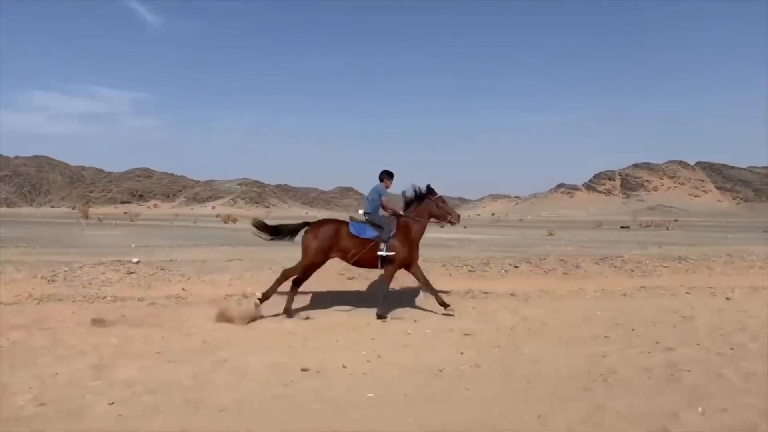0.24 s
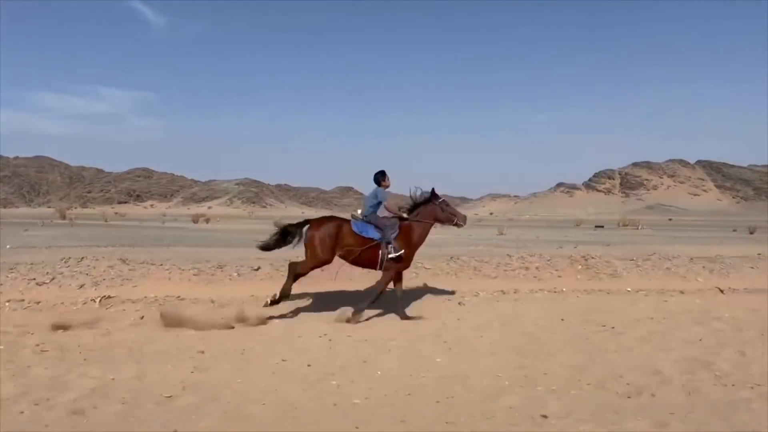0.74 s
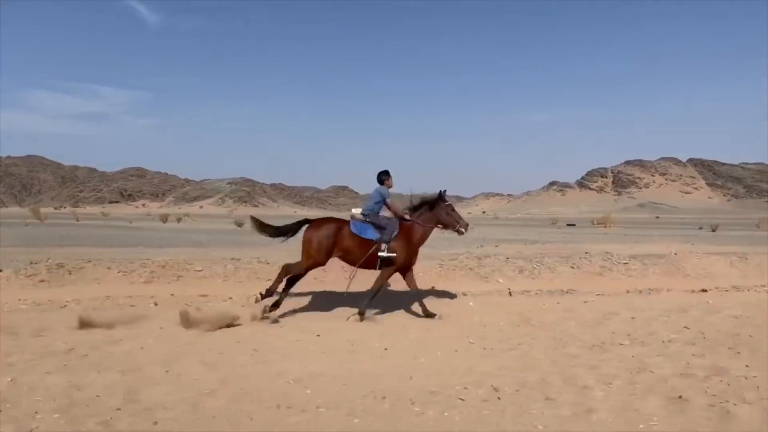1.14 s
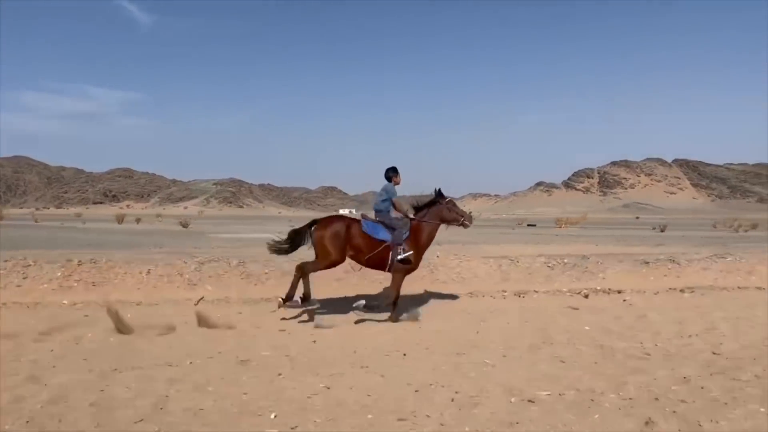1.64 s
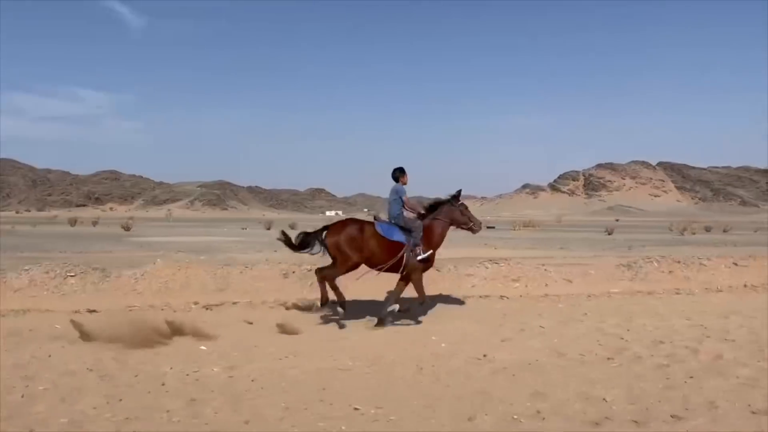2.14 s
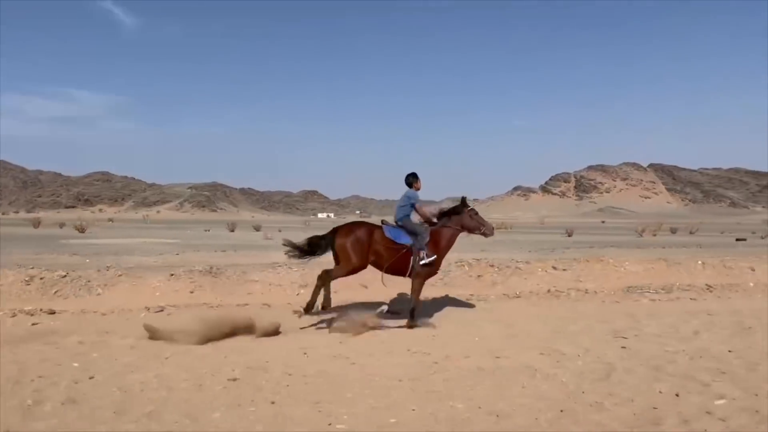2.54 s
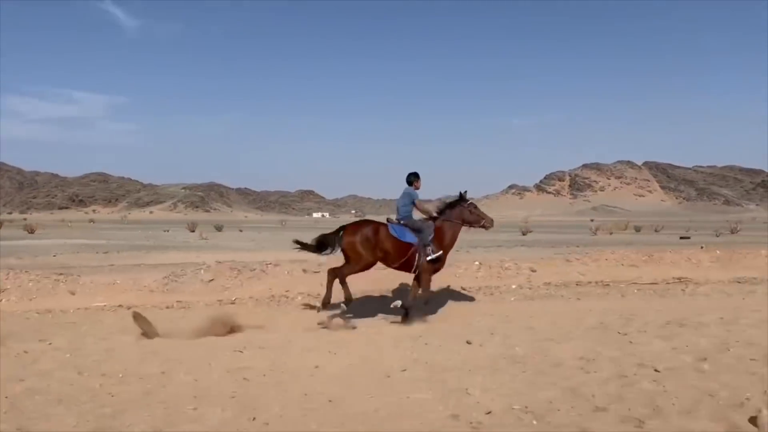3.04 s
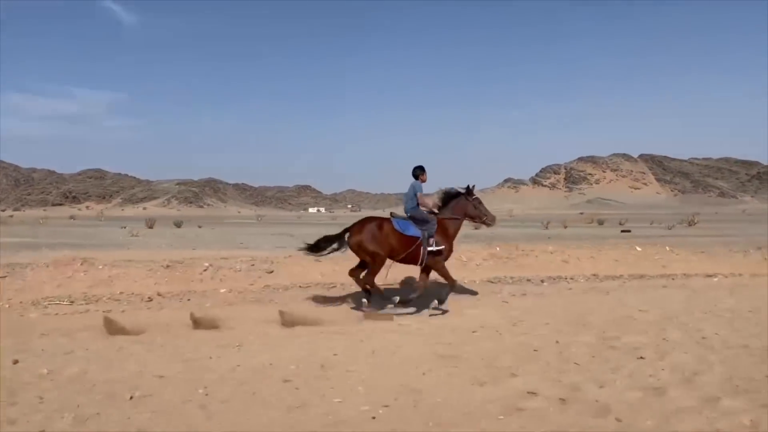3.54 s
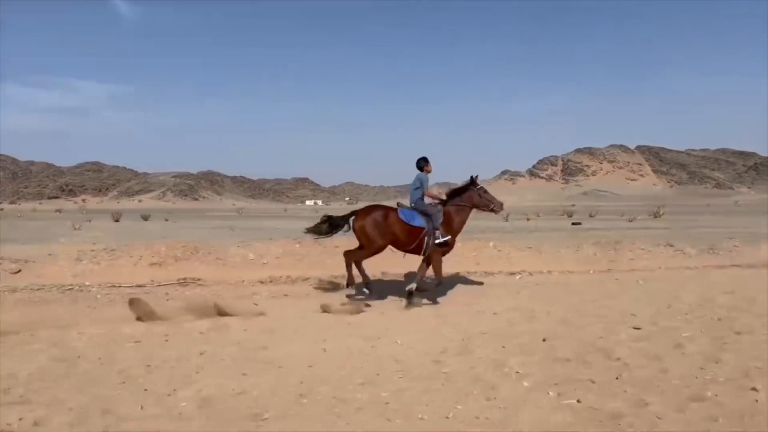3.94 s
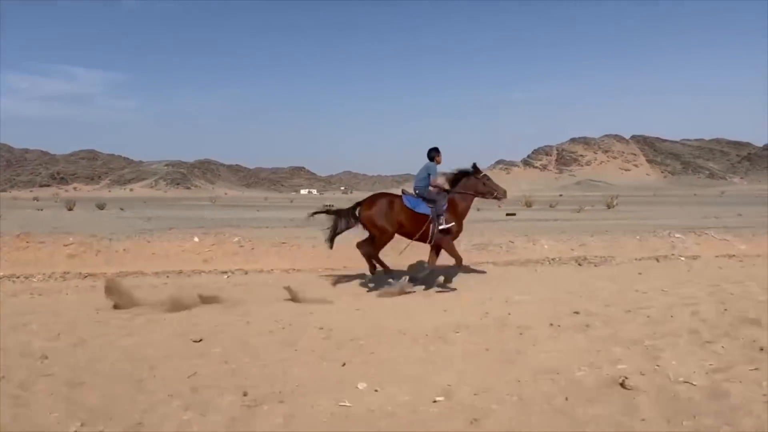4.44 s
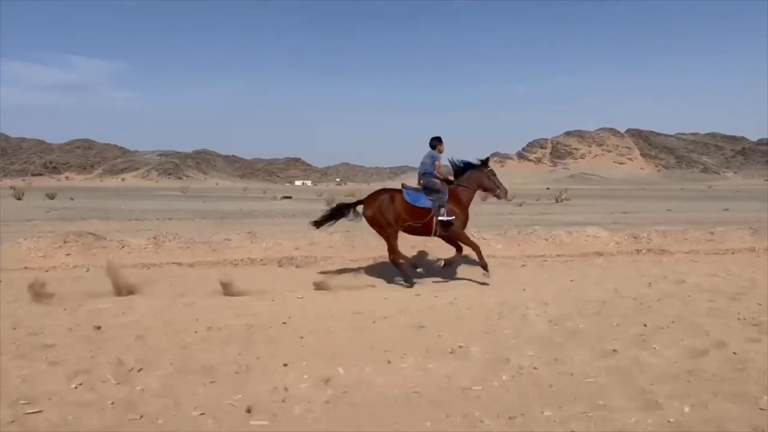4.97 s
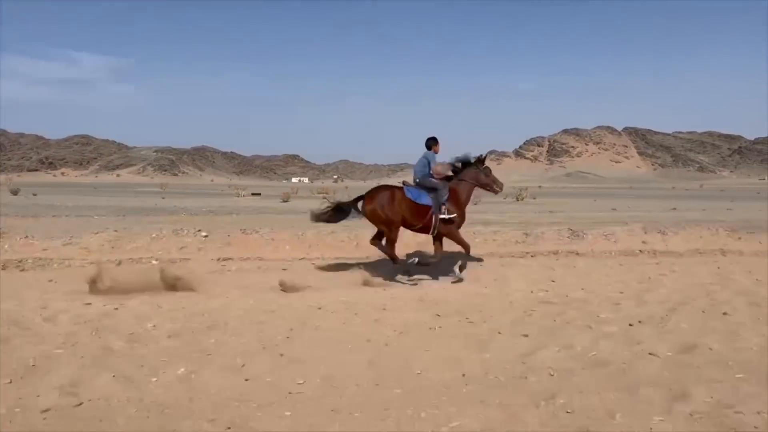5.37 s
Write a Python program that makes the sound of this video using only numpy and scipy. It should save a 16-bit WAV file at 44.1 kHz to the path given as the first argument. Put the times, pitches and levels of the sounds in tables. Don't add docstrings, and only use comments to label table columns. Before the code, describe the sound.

A galloping horse on open sand: dull low thuds with cracking crust and snapping stones, first in a strong uneven cluster, then sparser and softer. Loose metal fittings tick and clink between beats. Wind buffets the microphone with deep rumble and faint hiss throughout. In the last second the hooves become dense, loud and nearly overloaded. Dry outdoor sound, no echo, stereo microphone moving alongside.

```python
import sys
import numpy as np
from scipy import signal
from scipy.io import wavfile
from scipy.ndimage import uniform_filter1d

SR = 44100
rng = np.random.default_rng(int(sys.argv[2]) if len(sys.argv) > 2 else 0)


def volts_from_decibels(level):
    exponent = np.asarray(level, float) / 20
    return 10 ** exponent


def wav_out(sig):
    wavfile.write(sys.argv[1], SR, np.round(np.clip(np.atleast_2d(sig).T, -1, 1) * 32767).astype(np.int16))


N = 247301
OPPOSED = np.array([[1], [-1]])

# [crest t/s, knock level/dB, knock f/Hz, swell level/dB, crack level/dB]
LANDINGS = [(0.014, -16.5, 203, -9, -26), (0.427, -10, 270, -6.5, -30), (0.767, -5.5, 269.8, -9, -19.5),
            (1.127, -13, 262, -11.5, -35), (1.687, -2, 225.4, -5, -49), (2.411, -18, 226, -15, -47),
            (2.482, -18.5, 259, -14.5, -50), (2.771, -18, 210.3, -9.5, -33),
            (3.741, -17.5, 192.3, -11.5, -46), (3.979, -11, 226, -6.5, -38), (4.716, -2.5, 287.6, -5, -34),
            (4.822, -2, 258.8, -6, -24), (4.917, -5.5, 297, -4.5, -28), (5.077, -11.5, 287, -8, -45),
            (5.143, -9.5, 236.7, -3.5, -9), (5.261, -8, 346.6, -5, -33), (5.488, -12, 214.5, -7, -48),
            (5.573, -2, 267.7, -9, -17.5)]
# [crest t/s, knock level/dB, knock f/Hz, crack level/dB]
TOUCHES = [(0.351, -12, 210, -38), (0.415, -13, 243, -52), (0.746, -3, 187.7, -50),
           (1.706, -15.5, 280, -50), (2.786, -8.5, 274.4, -40), (4.171, -17, 229, -56),
           (4.194, -12.5, 254.4, -35), (4.682, -19, 182, -35), (4.761, -12, 254, -34),
           (4.832, -6, 306, -38), (4.992, -13.5, 281, -54), (5.113, -14.5, 206.5, -46),
           (5.159, -7, 253, -25), (5.242, -5, 177.5, -29), (5.279, -18, 250, -28), (5.286, -13.5, 241, -29)]


def rms_one(x):
    return x / np.sqrt(np.mean(x ** 2) + 1e-20)


def stereo_rms_one(x):
    return x / np.sqrt(np.mean(x.mean(axis=0) ** 2))


def at_hz(points, hz):
    table = np.array(points, float)
    return np.interp(np.log(hz), np.log(table[:, 0] + 1), table[:, 1])


def drift(rate_hz):
    r = np.exp(-40 * np.pi * rate_hz / SR)
    white = rng.standard_normal(N // 20 + 4002)
    slow = signal.lfilter([1], [1, -2 * r, r * r], white)[4000:]
    return np.interp(np.arange(N) / 20, np.arange(len(slow)), rms_one(slow))


def band(x, low_hz, high_hz, order=2):
    return signal.sosfilt(signal.butter(order, [low_hz, high_hz], "band", fs=SR, output="sos"), x)


def steep(x, edge_hz, kind):
    return signal.sosfilt(signal.ellip(10, .5, 65, edge_hz, kind, fs=SR, output="sos"), x)


def pan(x, left_db):
    return x * volts_from_decibels([[left_db / 2], [-left_db / 2]])


def add(out, piece, s):
    at = round(s * SR) - piece.shape[1] // 2
    piece = piece[:, max(-at, 0):N - at]
    out[:, max(at, 0):max(at, 0) + piece.shape[1]] += piece


def swell(hz, width_ms, fall, rough, reach):
    width = width_ms * SR / 1000
    t = np.arange(-3 * width, 3 * width) / width
    pitch_hz = hz * np.exp(-np.clip(fall * t, -1.2, 1.2))
    swing = np.sqrt(2) * np.sin(2 * np.pi * (np.cumsum(pitch_hz) / SR + rng.random()))
    white = rng.standard_normal((3, len(t) + 1024))
    noise = rms_one(band(white, .55 * hz, reach * hz, order=3)[:, 1024:])
    ports = noise[2] + 0.32 * noise[:2]
    shape, share = np.exp(-1.9 * t ** 2), np.clip(rough, 0, 1)
    mixed = shape * (np.sqrt(1 - share) * swing + np.sqrt(share) * ports)
    return mixed * np.sqrt(np.sum(shape ** 2) / np.sum(mixed.mean(axis=0) ** 2) / 2)


def knocks():
    # [crest t/s, level/dB, f/Hz]
    scuffs = [(0.388, -22, 275), (0.447, -20, 243.4), (0.635, -14.5, 197.5), (1.343, -19.5, 224),
              (1.41, -19, 196), (1.469, -36, 186.4), (2.494, -31, 225), (2.629, -19, 247.6),
              (3.264, -22, 269.6), (3.538, -21, 257), (3.591, -19, 225), (3.864, -24, 200),
              (3.927, -21, 192), (3.96, -26, 193.3), (4.119, -21, 232), (4.132, -17, 233),
              (4.179, -17, 213), (4.786, -17, 306), (5.098, -16, 262), (5.394, -22, 236.5),
              (5.461, -17.5, 233), (5.497, -17, 227)]
    # [crest t/s, level/dB, f/Hz, width/ms]
    last_thud = (5.6052, -19, 450, 4)
    out, cycles = np.zeros((2, N)), 1.75
    rows = [row[:3] for row in LANDINGS + TOUCHES + scuffs]
    thuds = [(s, crest_db, hz, 1000 * cycles / hz) for s, crest_db, hz in rows]
    for s, crest_db, hz, width_ms in thuds + [last_thud]:
        add(out, volts_from_decibels(crest_db - .7) * swell(hz, width_ms, fall=.7, rough=.14, reach=1.8), s)
    return out


def low_swell(hz, width_ms):
    return swell(hz, width_ms, fall=.35, rough=0.43, reach=2.04)


def hoof_swells():
    out, lag_s = np.zeros((2, N)), 0.01189
    for s, _, _, swell_db, _ in LANDINGS:
        add(out, volts_from_decibels(swell_db) * low_swell(hz=77.88, width_ms=24.5), s + lag_s)
    return out


def add_crack(out, s, crest_db, hz, grit_db, width_ms):
    crack = swell(.85 * hz, width_ms, fall=.45, rough=.4, reach=1.7)
    grit = swell(1835, width_ms, fall=.05, rough=.9, reach=1.3)
    left_db = np.clip(-4 - 0.34 * grit_db, -8, 8)
    add(out, pan(volts_from_decibels(crest_db - .7), left_db) * crack, s)
    add(out, pan(volts_from_decibels(crest_db + grit_db + 7.0), left_db) * grit, s)


def hoof_cracks():
    out, lead_s = np.zeros((2, N)), 0.001914
    for row in LANDINGS + TOUCHES:
        s, crack_db = row[0], row[-1]
        grit_db = -25 + .3 * (crack_db + 20)
        add_crack(out, s - lead_s, crack_db, 766.4, grit_db, width_ms=4.1)
    return out


def bodies():
    # [crest t/s, level/dB, width/ms, level of the part opposed in the ports/dB]
    body_rows = [(0.748, -18.5, 6, -36), (0.764, -35, 7.8, -34), (0.878, -39, 8.6, -20),
                 (1.124, -28, 4.3, -42), (1.684, -26, 6.8, -16), (2.777, -29.5, 8.1, -28),
                 (2.985, -38, 8.7, -23), (3.63, -25, 4.3, -36), (4.19, -33, 5, -40), (4.721, -24, 7.7, -17),
                 (4.761, -27, 4.9, -29), (4.814, -14, 5, -25), (4.826, -30, 9.8, -17),
                 (4.914, -13.5, 7.7, -25), (5.11, -23, 4.6, -36), (5.145, -12, 9.7, -26),
                 (5.157, -14, 6.3, -24), (5.263, -20, 13, -25), (5.28, -22, 5.1, -30),
                 (5.568, -18, 6.7, -28)]
    out = np.zeros((2, N))
    for s, crest_db, width_ms, opposed_db in body_rows:
        hollow = swell(600, width_ms, fall=.2, rough=.6, reach=1.5)
        shake = swell(415, width_ms, fall=.2, rough=.6, reach=1.6)
        add(out, pan(volts_from_decibels(crest_db), 4.0) * hollow, s)
        add(out, volts_from_decibels(opposed_db) * shake * OPPOSED, s)
    return out


def snaps():
    # [crest t/s, level/dB, f/Hz]
    snap_rows = [(0.3475, -17, 634), (0.384, -35, 2480), (0.411, -32, 530), (0.4236, -12, 600),
                 (0.436, -22, 450), (0.461, -25.5, 1500), (1.1252, -32, 650), (0.617, -17, 79.5),
                 (1.925, -19, 65.3), (2.7745, -22, 645), (2.976, -17.5, 65), (3.565, -19, 75),
                 (3.7245, -25, 876), (4.7225, -9, 520), (4.7273, -8, 203), (4.735, -12, 430),
                 (4.83, -3, 115), (4.844, -19, 400), (5.2545, -12, 520), (5.2625, -12, 560),
                 (5.2775, -10, 150), (5.527, -36, 1500), (0.7499, -18.5, 1530), (0.7643, -18, 795),
                 (1.3366, -22.5, 1720), (1.6815, -17.5, 533), (3.63, -34, 910), (4.1905, -24.5, 620),
                 (4.7115, -32, 650), (4.7605, -28, 700), (4.813, -29, 900), (4.824, -4, 520),
                 (4.9118, -23, 775), (5.0792, -26, 2760), (5.1105, -37, 800), (5.147, -11, 560),
                 (5.167, -18, 520), (5.136, -13.5, 1410), (5.1433, -23, 900), (5.149, -35, 2770),
                 (5.5665, -16.5, 800)]
    # [crest t/s, level/dB, f/Hz]
    last_snap = (5.60785, -7, 560)
    # [crest t/s, level/dB, f/Hz]
    ping_rows = [(1.156, -39, 2650), (1.234, -35, 2700), (3.053, -36, 2700), (3.221, -32, 2620),
                 (3.227, -38, 3420), (4.818, -19.5, 1640), (4.832, -29, 1450), (5.079, -30, 1500),
                 (5.141, -17, 2400), (5.151, -30, 1900), (4.913, -36, 1680), (4.915, -37, 2400),
                 (4.82, -33, 2530), (5.255, -30, 1580), (5.261, -39, 2000), (5.273, -36, 1300),
                 (5.265, -38, 1700)]
    out, t = np.zeros((2, N)), np.arange(-1536, 1536) / SR
    snap_cycles, ping_cycles = 0.72, 3.2
    strikes = [(*row, snap_cycles) for row in snap_rows + [last_snap]]
    strikes += [(*row, ping_cycles) for row in ping_rows]
    for s, crest_db, hz, cycles in strikes:
        crest = np.cos(2 * np.pi * hz * t) * np.exp(-(hz * t / cycles) ** 2)
        add(out, pan(volts_from_decibels(crest_db) * crest, 4.6), s)
    return out


def sprays():
    # [crest t/s, level/dB, width/ms]
    spray_rows = [
        (4.718, -58, 11),
        (4.823, -26, 12),
        (5.148, -62, 13),
        (5.266, -40, 11),
        (5.572, -42, 10),
    ]
    out = np.zeros((2, N))
    for s, crest_db, width_ms in spray_rows:
        add(out, pan(volts_from_decibels(crest_db), 5.0) * swell(1200, width_ms, fall=.05, rough=1, reach=1.5), s)
    return out


def slaps():
    # [crest t/s, level/dB, centre f/Hz, grit over crest/dB]
    slap_rows = [(0.041, -31, 1007, -9.5), (0.462, -33.5, 1068, -6), (0.75, -25, 1107, -32),
                 (0.878, -32.5, 1078, -9), (1.157, -33, 1094, -9), (1.235, -27, 890, -11.5),
                 (1.337, -32, 1530, -11), (2.331, -28.5, 898, -19), (2.745, -29, 1025, -17),
                 (2.794, -27, 743, -22), (2.834, -36, 1330, -9.5), (3.052, -23, 861, -18),
                 (3.223, -27, 1110, -7.5), (3.63, -33, 970, -7), (3.725, -20.5, 784, -26),
                 (4.086, -28.5, 1550, -9), (4.226, -25.5, 930, -18), (4.234, -28, 970, -16),
                 (4.625, -24.5, 760, -33), (4.721, -19, 675, -28), (4.819, -24, 1746, -33),
                 (4.962, -21.5, 947, -33), (5.08, -32.5, 1130, -4), (5.11, -27, 790, -25),
                 (5.1412, -21, 2287, -30), (5.151, -7, 782, -19.5), (5.255, -27, 746, -35),
                 (5.269, -20, 833, -39), (5.528, -30, 1150, -13)]
    out = np.zeros((2, N))
    for row in slap_rows:
        add_crack(out, *row, width_ms=3.2)
    return out


def fittings():
    # [t/s, click level/dB, top
    # edge over click/dB]
    tick_rows = [(0.038, -27.5, -9.5), (0.383, -43.5, 10.5), (0.459, -27, -3), (0.506, -53, -15),
                 (0.602, -58, -10), (0.76, -28, -35), (0.872, -63, -44), (0.962, -57, -25), (1.031, -31, 1),
                 (1.437, -35, -14), (1.648, -26, 7), (1.921, -60, -17), (2.152, -47, 8),
                 (2.715, -36.5, -21), (2.834, -38.5, 6), (3.584, -35, -16), (3.625, -53, -12),
                 (3.723, -35.5, 4), (4.989, -45, -21), (5.394, -29, -26.5), (5.606, -51, -2)]
    # [t/s, click level/dB, ring level/dB, upper modes over ring/dB, ring ends after t/s]
    clink_rows = [(0.682, -46, -63, -4, 0.034), (1.151, -29, -48, 6.5, 0.05), (1.229, -34, -52, 8.5, 0.034),
                  (1.314, -36, -54, 8.5, 0.039), (1.401, -30, -56.5, 7, 0.034), (1.465, -44, -68, 16, .02),
                  (1.487, -54, -62.5, -8, 0.044), (1.57, -49, -55, 0, 0.058),
                  (1.83, -51, -61.5, -13, 0.051), (1.905, -34, -64, 10, .04), (2.329, -29.5, -54, 9, .028),
                  (2.95, -39, -58, -9, 0.037), (3.05, -43, -50.5, 10, 0.037),
                  (3.095, -33, -59.5, 11, 0.031), (3.22, -22.5, -51.5, 9, 0.033),
                  (3.654, -58, -66, -14, 0.028), (4.137, -43, -52.5, 8, 0.044),
                  (4.222, -25, -53, 7.5, 0.028), (5.078, -28.5, -64, 11, 0.024),
                  (5.305, -35, -66.5, 17.5, .02), (5.431, -47, -61, 9, 0.023),
                  (5.526, -29.5, -71, 21, .015)]
    # [f/Hz, level/dB, t40 (time to fall by 40 dB)/s]
    modes = [(2170, -8, .09), (3130, -8, .06), (3908, -2, .14), (4317, -8, .12), (4740, -2, .12),
             (5172, -2, .14), (5631, 1.5, .13), (6610, -19, .06), (7105, -15, .07), (7635, -16, .05),
             (8150, -15, .055), (8655, -13, .05), (9170, -15, .04), (10920, -17, .025)]
    out, t = np.zeros((2, N)), np.arange(int(.12 * SR)) / SR
    hz, mode_db, t40_s = np.transpose(modes)[:, :, None]
    hits = [(*row, -71, 11.5, .03) for row in tick_rows]
    hits += [(s, click_db, -31 + 1.3 * upper_db, ring_db, upper_db, held_s)
             for s, click_db, ring_db, upper_db, held_s in clink_rows]
    for s, click_db, top_db, ring_db, upper_db, held_s in hits:
        ring_gate = np.clip((held_s + .01 - t) / .02, 0, 1) * np.clip(t / .002, 0, 1) ** 2
        burst = rng.standard_normal((4, len(t))) * (np.exp(-t / .0013) + .12 * np.exp(-t / .01))
        top = band((burst[2] + 1.2 * burst[3] * OPPOSED) * (t < .004), 9700, 11300)
        click = steep(band(burst[:2] * .75 + burst[2], 2200, 9300), 9600, "low")
        click = click + volts_from_decibels(top_db + 6) * top

        strength_db = mode_db + (hz > 6000) * (upper_db + 6) + rng.normal(0, 1.6, hz.shape)
        beats = rng.uniform(15, 70, hz.shape) * t + rng.random(hz.shape)
        strength = volts_from_decibels(strength_db - 40 * t / t40_s) * (1 + .3 * np.sin(2 * np.pi * beats))
        apart = rng.normal(.05, 1, hz.shape) * np.where((hz > 4000) & (hz < 5400), .16, .07)
        turns = rng.random(hz.shape) + np.array([apart, 0 * apart])
        rings = np.array([np.sum(strength * np.sin(2 * np.pi * (hz * t + turn)), axis=0) for turn in turns])

        white = rng.standard_normal((3, len(t)))
        rattle = steep(band(white[0] + 0.86 * white[1:], 1900, 4600), 9600, "low")
        rattle = rattle * np.exp(-t / 0.012) * volts_from_decibels(11.5)
        housing = rms_one(band(white[1], 280, 1200)) * np.exp(-t / 0.0068)
        housing = housing * volts_from_decibels(ring_db + 31.5) * [[.8], [-1]]
        knock = volts_from_decibels(click_db - 4.5) * click + volts_from_decibels(ring_db + 7.0) * ring_gate * (rings + rattle)
        add(out, pan(knock, 1.4) + housing * ring_gate, s + t[-1] / 2)
    return out


def puffs():
    # [crest t/s, level/dB, width/ms]
    puff_rows = [(0.378, -10.5, 25.6), (0.482, -16, 50), (0.557, -15.5, 33), (1.02, -21, 34),
                 (1.305, -15.5, 29.6), (1.536, -14.5, 16), (1.573, -24, 17), (1.813, -19, 20),
                 (1.91, -17, 15.3), (2.253, -21, 15.5), (2.696, -12, 31), (2.817, -30, 21),
                 (2.997, -16.5, 45), (3.05, -21, 17.4), (3.326, -30, 17), (3.402, -24, 37),
                 (3.569, -18, 28), (3.708, -21, 23), (4.047, -17.5, 31), (4.111, -19, 20.3),
                 (4.234, -12, 25.7), (4.304, -14, 21.7), (4.359, -17, 16.5), (4.432, -18.5, 13),
                 (4.678, -11, 16.8), (4.869, -12, 26), (5.033, -11, 44)]
    out = np.zeros((2, N))
    for s, crest_db, width_ms in puff_rows:
        hz = 69.38 * (25 / width_ms) ** 0.29
        add(out, volts_from_decibels(crest_db) * low_swell(hz, width_ms), s)
    return out


def air_noise(spectrum, shared_db, own_db, lumps_per_s):
    # [f/Hz, level/dB]
    side_db = [(60, -12), (140, -12), (340, -5.5), (820, 2.5), (1960, -4), (4680, -4), (8800, -4.5),
               (11200, -25.5)]
    # [f/Hz, level/dB]
    lean_db = [(60, -0.5), (220, 1), (820, -0.5), (3030, 2.5), (11200, 0)]
    together, white = drift(lumps_per_s), rng.standard_normal((2, 2, N))
    octaves = np.log2(spectrum[-2][0] / spectrum[0][0])
    edges_hz = spectrum[0][0] * 2 ** np.arange(0, octaves + .3, .5)
    out = 0
    for k, (low_hz, high_hz) in enumerate(zip(edges_hz, edges_hz[1:])):
        mid, side = band(white[k % 2], low_hz, high_hz)
        hz = np.sqrt(low_hz * high_hz)
        lumps_db = shared_db * together + own_db * drift(3.53 * lumps_per_s)
        gain = volts_from_decibels(at_hz(spectrum, hz) + lumps_db)
        ports = mid + volts_from_decibels(at_hz(side_db, hz)) * side * OPPOSED
        out = out + pan(gain, at_hz(lean_db, hz)) * ports
    return stereo_rms_one(out)


def evened(x, span_s, depth):
    span = int(span_s * SR)
    power = uniform_filter1d(uniform_filter1d(x.mean(axis=0) ** 2, span), span)
    return stereo_rms_one(x / (power + .02) ** (depth / 2))


def port_hiss():
    flicker_hz = (10850, 11050, 11200, 11400)
    white, together = rng.standard_normal((2, N)), drift(5)
    hiss = rms_one(band(steep(white[0], [9000, 11100], "band"), 9750, 10800, order=1))
    hiss_db = -60 + 1.5 * together + 2.0 * rms_one(band(white[1], 8, 45))
    flicker = 0
    for hz in flicker_hz:
        gate = np.clip(2 * (.5 * together + drift(10)) - 2.5, 0, 1)
        flicker = flicker + gate * rms_one(band(white[1], hz - 45, hz + 45, order=3))
    return volts_from_decibels(hiss_db) * hiss * OPPOSED + volts_from_decibels(-66.5) * flicker


def wind():
    # [t/s, level/dB]
    gusts = [(0.0, -4.5), (0.53, -4), (1.0, -3), (1.29, -1), (1.51, -1), (2.05, -4.5), (2.45, -2.5),
             (3.19, -1.5), (4.2, 1.5), (4.47, 0), (4.67, 0.5), (4.86, 2), (5.33, 0.5), (5.5, 2.5),
             (5.61, 3.5)]
    # [f/Hz, level per Hz/dB]
    buffet_spectrum = [(11, -29), (18, -17), (48, 10), (75, 1.5), (140, 1), (236, -11), (485, -19),
                       (700, -43.5), (910, -19.5), (1540, -120)]
    # [f/Hz, level per Hz/dB]
    rush_spectrum = [(180, -26), (300, -0.5), (491, -1), (847, -10.5), (1370, -11), (1490, -15),
                     (1600, -14), (3500, -30), (4550, -45.5), (7700, -120)]
    # [f/Hz, level per Hz/dB]
    hiss_spectrum = [(1470, -37), (2500, -0.5), (5920, -6.5), (7370, -7), (8920, -10), (9600, -1),
                     (12500, -34), (21100, -120)]
    gust_db = np.interp(np.arange(N) / SR, *np.transpose(gusts))
    buffet = air_noise(buffet_spectrum, shared_db=2.5, own_db=2.0, lumps_per_s=7.9)
    buffet = volts_from_decibels(-21.5 + gust_db) * evened(buffet, span_s=0.13, depth=0.6)
    rush = air_noise(rush_spectrum, shared_db=1.0, own_db=2.5, lumps_per_s=9.8)
    rush = volts_from_decibels(-36 + gust_db) * rush
    hiss = air_noise(hiss_spectrum, shared_db=0.85, own_db=2.5, lumps_per_s=7.7)
    hiss = volts_from_decibels(-53 + 0.98 * gust_db) * hiss
    return steep(buffet + rush + hiss, 9600, "low") + port_hiss()


def whines():
    # [f/Hz, width/Hz, level/dB, share in the difference channel 0-1, start t/s, end t/s]
    whine_rows = [
        (1490, 45, -53, .35, 0, 2.9),
        (7040, 10, -68, .9, .5, 4.6),
        (7040, 12, -61, .3, 4.62, 5.3),
    ]
    out, t = np.zeros((2, N)), np.arange(N) / SR
    for hz, width_hz, level_db, share, start_s, end_s in whine_rows:
        tone = rms_one(band(rng.standard_normal(N), hz - width_hz / 2, hz + width_hz / 2))
        fade = np.clip(np.minimum(t - start_s, end_s - t) / 0.043, 0, 1)
        out += fade * volts_from_decibels(level_db + 2.0 * drift(3.0)) * tone * [[1], [1 - 2 * share]]
    return out


def scene():
    hooves = knocks() + hoof_swells() + hoof_cracks() + bodies() + snaps() + sprays()
    return hooves + slaps() + fittings() + puffs() + wind() + whines()


def thinned(x):
    # [f/Hz, share 0-1]
    side_kept = [(2600, 1), (3300, .9), (3700, .5), (4500, .55), (4900, .85), (5600, .8), (5800, .12),
                 (7000, .2), (7900, .3), (8300, .08), (8800, .12), (9000, 1)]
    hz, _, side = signal.stft((x[0] - x[1]) / 2, SR, nperseg=1024)
    group = np.arange(len(hz)) // 8
    power = np.add.reduceat(abs(side) ** 2, np.arange(0, len(hz), 8))
    power = uniform_filter1d(power * volts_from_decibels(rng.normal(0, 7, power.shape)), size=2)
    kept = np.interp(hz[::8] + 170, *np.transpose(side_kept))
    rank = ((1 - kept) * (power.shape[1] - 1)).astype(int)
    bar = np.sort(power)[np.arange(len(kept)), rank]
    side = signal.istft(side * (power >= bar[:, None])[group], SR, nperseg=1024)[1][:N]
    return x.mean(axis=0) + side * OPPOSED


def low_pass(x):
    return signal.sosfilt(signal.butter(12, 11790, fs=SR, output="sos"), x)


def record(dry):
    rounded = 1.05 * np.tanh((dry + .3 * dry ** 3) / 1.05)
    mix = thinned(steep(rounded, 11700, "low"))
    return low_pass(mix)


dry = scene()
out = record(dry)
wav_out(out)
```